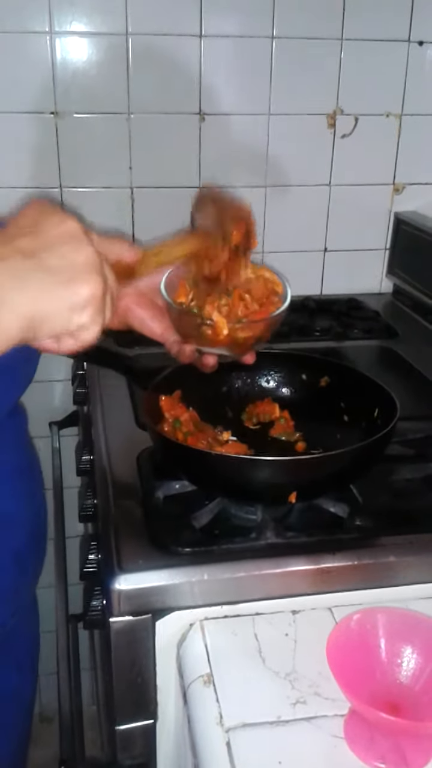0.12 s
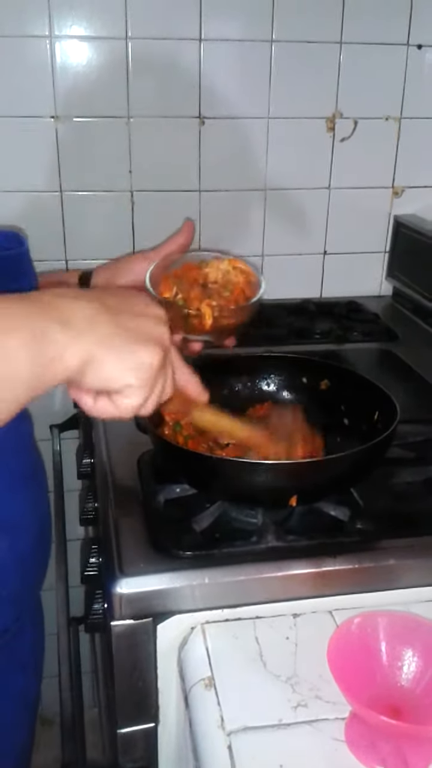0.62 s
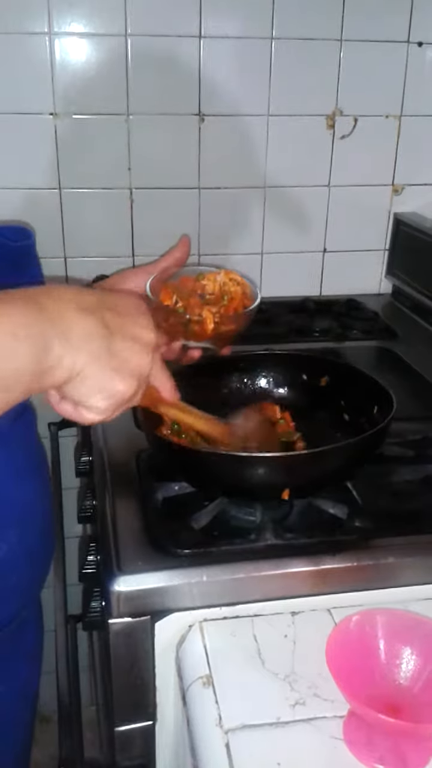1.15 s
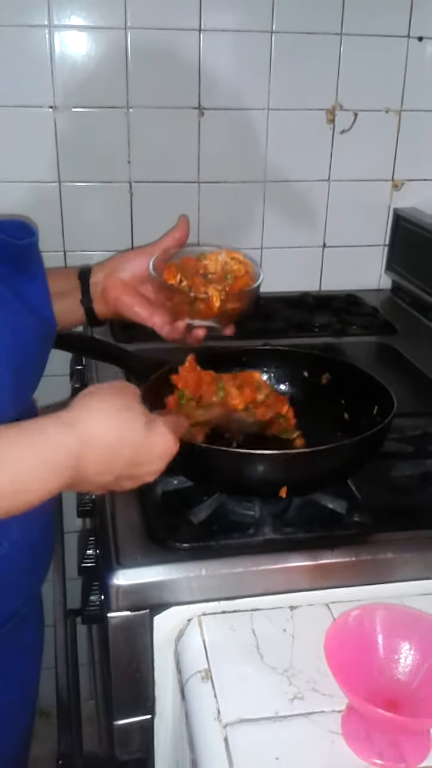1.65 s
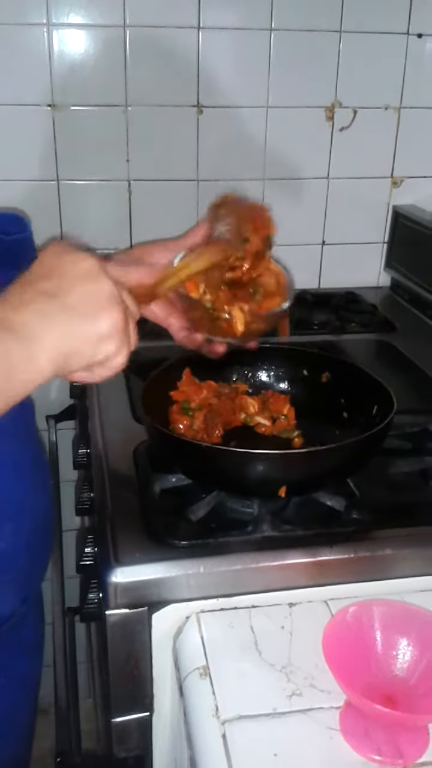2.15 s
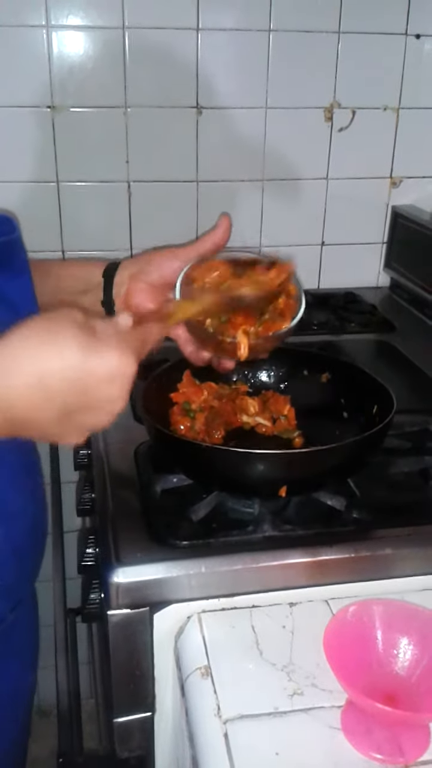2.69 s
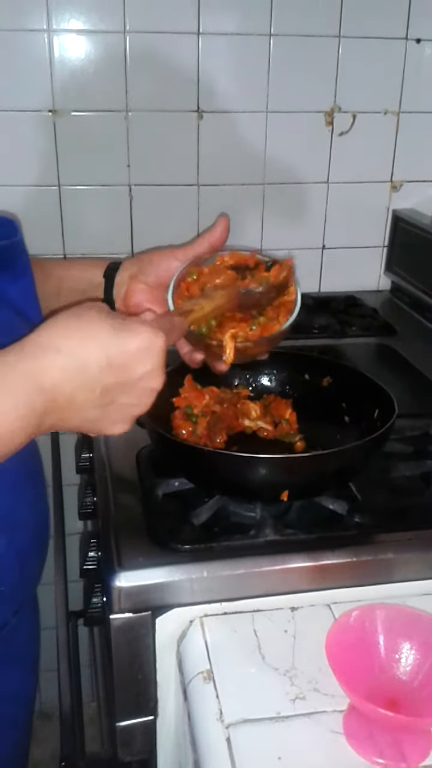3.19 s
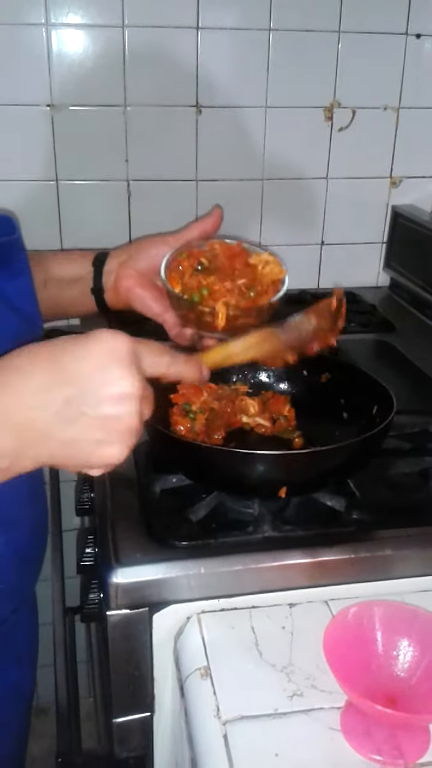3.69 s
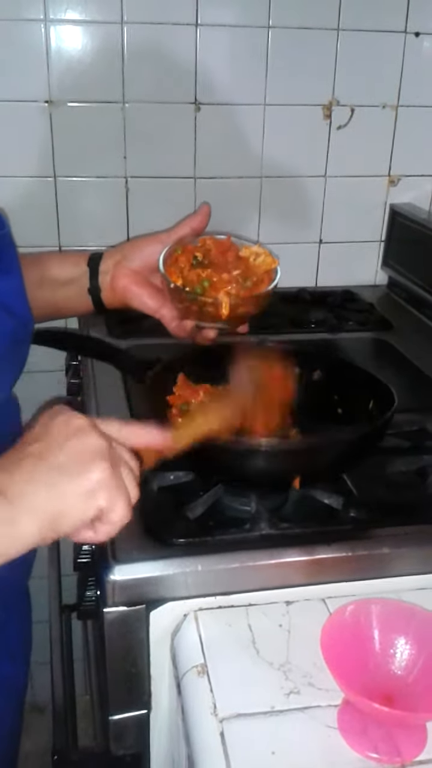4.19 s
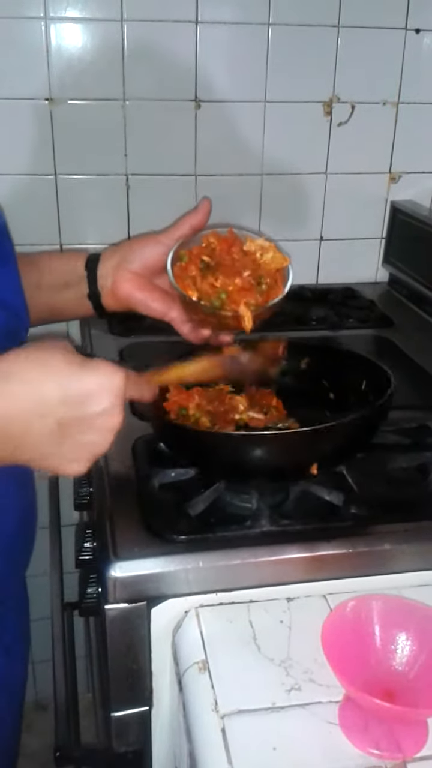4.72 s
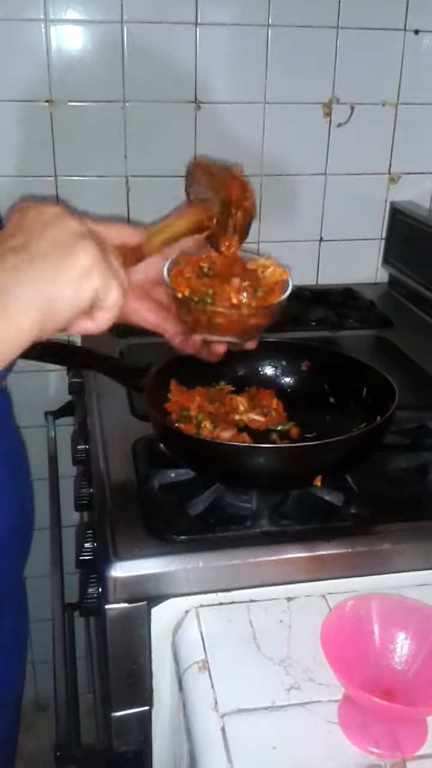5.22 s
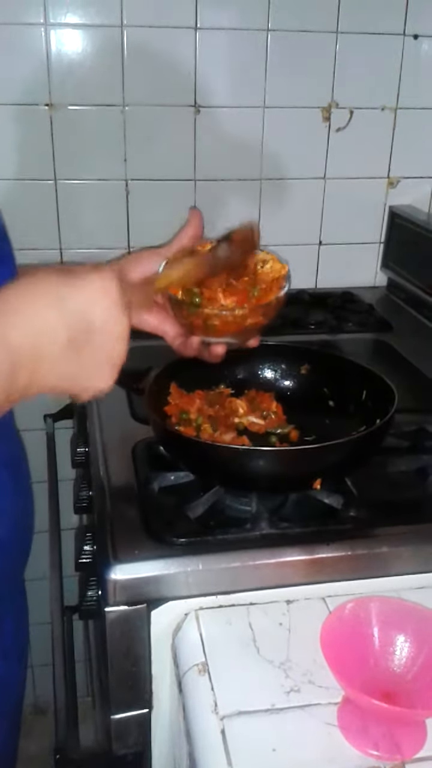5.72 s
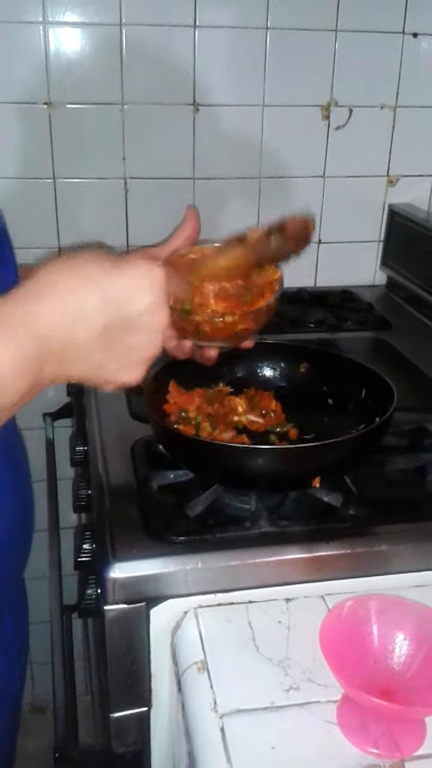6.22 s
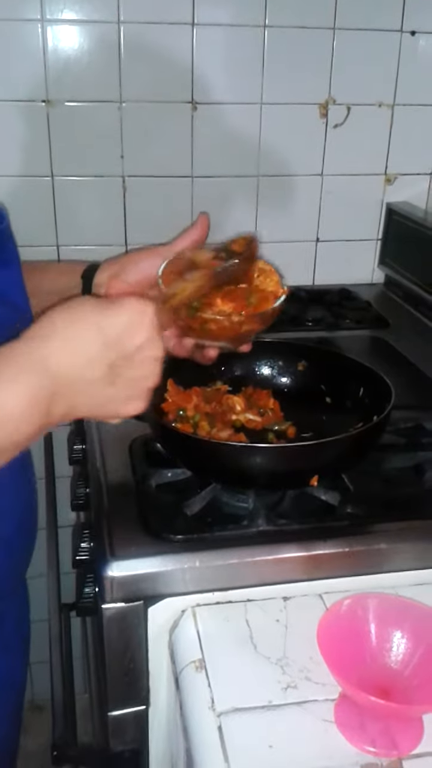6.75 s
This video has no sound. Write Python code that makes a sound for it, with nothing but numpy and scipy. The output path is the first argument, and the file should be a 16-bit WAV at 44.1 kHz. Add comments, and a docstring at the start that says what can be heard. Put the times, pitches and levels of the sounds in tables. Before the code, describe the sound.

A wooden spoon scrapes faintly through moist food in a frying pan, with one small metallic tick early on. After a quiet stretch of soft swipes, it raps the pan hard in a quick uneven volley, rattling it on the iron grate. Shorter scrapes follow and thin out before a small dull tap on a glass bowl. Close microphone, small bright tiled kitchen, steady low motor hum and faint hiss.

```python
"""Spoon and frying pan

A wooden spoon scrapes food around a frying pan, knocks the pan so that it rattles on its iron grate, and taps a
glass bowl, in a small tiled kitchen. Random grains of friction and bursts of clicks excite the decaying modes
of the pan; squeaks, a brief high clink and a chirp are narrow tones. Sparse reflections form the room, and an
appliance motor hums over a faint hiss."""
import sys
import numpy as np
from scipy import signal
from scipy.fft import rfft, irfft, next_fast_len
from scipy.io import wavfile
from scipy.ndimage import uniform_filter1d, minimum_filter1d

SR = 44100
rng = np.random.default_rng(int(sys.argv[2]) if len(sys.argv) > 2 else 0)


def transcribe(signal):
    """Save signal, clipped to [-1, 1], as a 16-bit WAV file at the path in sys.argv[1]."""
    frames = np.atleast_2d(signal).T
    limited = np.clip(frames, -1, 1)
    pcm = np.round(limited * 32767).astype(np.int16)
    wavfile.write(sys.argv[1], SR, pcm)


def ratio(d):
    """dB to gain"""
    e = np.asarray(d, float) / 20
    return 10 ** e


N = 302960

# Centres of the low, middle, high and top bands in Hz.
BAND_HZ = [800, 2200, 4700, 8500]
# Modes of the pan. Each row: frequency in Hz, level in dB, t60 in seconds.
PAN_MODES = [(543, -8, 0.062), (647, -18.5, 0.23), (754, -1, 0.023), (927, 8.5, 0.021), (989, -12, 0.42),
             (1025, -1.5, 0.035), (1157, 2, 0.035), (1571, 3, 0.09), (1610, 1, 0.025), (1720, 6, 0.029),
             (2090, 9.5, 0.019), (2136, 2, 0.031), (2450, -12, 0.0113), (3176, 5, 0.034),
             (3340, -1.5, 0.05), (4350, -17, 0.033), (4360, 9, 0.015), (4270, -12, 0.07),
             (4716, 9.5, 0.024), (4930, -14, 0.074), (5170, 0, 0.033), (5670, -10, .03),
             (6750, -4.5, 0.041), (7700, -7, 0.019), (7340, -5, 0.04), (9100, -1, .02)]
# Colour of the pan and bowl sounds as heard, with a broad lift near 4-5 kHz. Each row: frequency in Hz, gain in
# dB.
HEARD_COLOUR = [(50, -28), (120, -19.5), (300, -4.5), (700, -3.5), (1500, -4.5), (2600, -6), (3700, -7),
                (4200, -3), (4800, -2), (5400, -2.5), (5900, -9.5), (7800, -9.5), (8800, -17), (10000, -17.5),
                (16000, -37)]


def scraping():
    """Friction as a dense train of uneven impulses into modes damped by food; contact sets the bands."""
    # Frictional colour compared with a blow. Each row: frequency in Hz, gain in dB.
    friction_colour = [(80, -8), (135, 9.5), (220, -1.5), (500, 1.5), (1250, 3.5), (2300, 3.5), (4400, 0),
                       (5600, -1.5), (9000, -1.5), (15000, 4)]
    strength = ratio(2.2 * np.minimum(rng.exponential(1, N), 3))
    present = rng.random(N) < 9000 / SR  # 9000 grains per second on average
    grains = rng.standard_normal(N) * strength * present
    damped = [(hz, db, t60 * 0.61) for hz, db, t60 in PAN_MODES]
    body = signal.oaconvolve(grains, ring(damped, spread_db=1.5, click_db=54))[:N]
    parts = bands(coloured(body, HEARD_COLOUR))
    parts = np.array([evened(coloured(part, friction_colour)) for part in parts])
    return (np.sqrt(contact()) * parts).sum(0)


def contact():
    """Powers of independent contacts add: swipes start fast and fade, drags follow the hand's pressure."""
    # Light swipes of the spoon's edge. Each row: start in seconds, time to fade by 22 dB in seconds,
    # high band in dB before the mix, middle band against it in dB, top band against it in dB.
    swipes = [(0.006, 0.29, -45.5, -12, -17), (0.632, 0.36, -49.5, -5.5, -5), (1.06, 0.32, -52, -4.5, -6.5),
              (1.317, 0.097, -61.5, 1.5, 7), (1.424, 0.18, -47.5, -3.5, -6.5), (1.923, 0.078, -57.5, -3, 2),
              (2.105, .2, -50.5, -6, -9), (2.376, 0.127, -53, -8, -17), (2.59, 0.19, -51.5, -2, -20),
              (2.693, 0.18, -47.5, -5, -10.5), (2.853, 0.32, -53, 3, -10), (3.08, 0.22, -38, -14, -11),
              (3.21, 0.72, -47, -11, -15), (3.355, 0.16, -46, -4, -8), (4.278, 0.06, -36, -7, -17.5),
              (4.906, 0.28, -36.5, -12, -10), (5.05, 0.23, -35.5, -1, -16), (5.531, 0.25, -47, -13, -10),
              (5.627, 0.068, -56, -8, -2), (5.953, .11, -61, -12, -16), (6.263, 0.088, -52.5, -5, -16),
              (6.626, 0.046, -51, -19.5, -11), (6.678, 0.042, -49, -7.5, 4)]
    # Heavy drags through the food, one curve each. Each row of a curve: time in seconds,
    # low band in dB before the mix, middle band against it in dB.
    drags = [
        [(.01, -70, 4), (.024, -52.5, 14.5), (.068, -42.5, 2), (.218, -56.5, -17), (.45, -76, 4),
         (.56, -56, -11), (.64, -64, -7)],
        [(1.93, -57, 1), (2.06, -79, -6.5), (2.29, -56, -9), (2.358, -53.5, 3), (2.57, -50, -11),
         (2.61, -51, 1), (2.87, -45, -4.5), (3.01, -52, -6), (3.1, -54.5, 4.5), (3.25, -63, 13), (3.47, -59, 9),
         (3.63, -51, -15), (3.86, -70.5, 12)],
        [(4.28, -36, -10), (4.3, -23, -8), (4.328, -16.5, -12.5), (4.35, -28, 0)],
        [(4.86, -31.5, -15), (4.906, -48.5, 5.5), (4.946, -32.5, -5), (5.036, -35, -0.5), (5.066, -38.5, 10),
         (5.138, -31.5, -1.5), (5.362, -42, -6.5), (5.532, -50, -8.5), (5.652, -46.5, -6.5), (5.778, -53, -7),
         (5.95, -68, -2), (6.16, -75, -12)],
    ]
    low_db, fade_db, fade_bend = -13, -22, 1.65  # low band is against the high band
    attack_s = np.array([[0.023]] * 3 + [[0.039]])  # the sharp top band swells more slowly
    drag_high_db, drag_top_db = -11, -23.5  # against the low band

    t = np.arange(N) / SR
    power = np.zeros((len(BAND_HZ), N))
    for start, length, db, body_db, edge_db in swipes:
        u = np.clip((t - start) / length, 0, None)
        rise = np.minimum(u * length / attack_s, 1)
        balance = ratio(np.array([[low_db], [body_db], [0], [edge_db]]))
        fade = ratio(db + fade_db * u ** fade_bend)
        power += (balance * rise * fade) ** 2
    for rows in drags:
        s, db, middle_db = np.transpose(rows)
        ends = np.clip(np.minimum(t - s[0], s[-1] - t) / .0091, 0, 1)  # 9.1 ms ramps
        low = ends * ratio(np.interp(t, s, db))
        middle = np.interp(t, s, middle_db)
        balance = ratio(np.array([0 * t, middle, 0 * t + drag_high_db, 0 * t + drag_top_db]))
        power += (low * balance) ** 2
    return power


def knock(db, body_db, edge_db):
    """Impact and chatter on the grate as source and resonator: a swelling burst of clicks into pan modes."""
    swell_s, middle_db = .0047, -1.7  # time to the peak of the chatter; middle band against the low band
    t = np.arange(SR // 8) / SR
    u = t / swell_s
    present = rng.random(len(t)) < 12000 / SR  # 12000 clicks per second on average
    z = rfft(rng.standard_normal(len(t)) * present * u * np.exp(-u))
    even = z / np.sqrt(uniform_filter1d(abs(z) ** 2, size=11))  # chatter favours no pitch
    clicks = irfft(even, len(t)) * (t < .08)
    body = signal.fftconvolve(clicks, ring(PAN_MODES, spread_db=2.0, click_db=43.5))
    body = np.pad(body, (200, 0))  # the filters also spread ahead of the blow
    parts = bands(coloured(body, HEARD_COLOUR))
    loudest = np.sqrt(uniform_filter1d(parts ** 2, size=400).max(1))  # rms of the loudest 9 ms
    levels = ratio(db + np.array([body_db, body_db + middle_db, 0, edge_db]))
    return levels / loudest @ parts


def struck(db, hz, t60, swell_s):
    """Free vibration of one mode: a sine swells with time constant swell_s and decays exponentially."""
    t = np.arange(SR // 4) / SR
    decay = ratio(db - 60 * t / t60)
    return decay * np.sin(2 * np.pi * hz * t) * (1 - np.exp(-t / swell_s))


def ring(modes, spread_db, click_db):
    """Modal superposition: the response to one click is the click plus decaying, unevenly struck modes."""
    t = np.arange(SR // 5) / SR
    hz, db, t60 = np.transpose(modes)[:, :, None]
    luck = rng.standard_normal((len(modes), 2))
    decay = ratio(db + spread_db * luck[:, :1] - 60 * t / t60)
    tones = np.sign(luck[:, 1:]) * decay * np.sin(2 * np.pi * hz * t)
    return tones.sum(0) + ratio(click_db) * (t == 0)


def tap(db):
    """Contact time limits bandwidth: soft wood stays on the glass for a moment and rounds the click."""
    # Modes of the bowl. Each row: frequency in Hz, level in dB, t60 in seconds.
    bowl_modes = [(780, -4, 0.0057), (1074, -3.5, 0.018), (1650, -5, 0.0075), (2700, -3, 0.0072),
                  (4540, -4.5, 0.0056)]
    touch = signal.windows.hann(11)
    sound = signal.oaconvolve(ring(bowl_modes, spread_db=-0.5, click_db=-24), touch)
    sound = coloured(sound, HEARD_COLOUR)
    return ratio(db) * sound / abs(sound).max()


def thin_tone(length, hz, db):
    """Stick-slip locked on one high mode, or a brief high clink: a narrow resonance of noise, so that the tone
    wavers."""
    size = round(length * SR)
    return ratio(db) * narrow(size, hz, 41.6) * signal.windows.tukey(size, .4)


def chirp(length, from_hz, to_hz, db):
    """Frequency as the rate of phase: a short falling slip of the wet spoon sums a sliding frequency."""
    size = round(length * SR)
    phase = 2 * np.pi * np.cumsum(np.linspace(from_hz, to_hz, size)) / SR
    return ratio(db) * np.hanning(size) * np.sin(phase)


def tail():
    """Statistical reverberation: sparse reflections of random sign, each band dying at its own speed."""
    # Decay of the room. Each row: frequency in Hz, t60 in seconds.
    room_decay = [(200, 0.64), (700, 0.52), (2000, 0.73), (5000, 0.39), (10000, 0.39), (16000, 0.44)]
    taps, at = np.zeros(SR), np.arange(130, SR - 20, 20)
    taps[at + rng.integers(0, 20, len(at))] = rng.choice([-1., 1.], len(at))
    hz, t, z = signal.stft(taps, SR, nperseg=256)
    decay = ratio(-60 * t / read(room_decay, hz)[:, None])
    out = signal.istft(z * decay, SR, nperseg=256)[1]
    return out / np.linalg.norm(out)


def kitchen():
    """Periodic and random sources superposed: a motor tone, its fuzzy upper bands and a smooth hiss."""
    # Fuzzy motor bands. Each row: frequency in Hz, resonator width in Hz, rms level in dB.
    motor_bands = [(256, 23, -67.5), (324.1, 30, -56.5), (378, 23, -65), (478.2, 16.4, -67)]
    # Spectrum of the hiss. Each row: frequency in Hz, relative density in dB per Hz.
    hiss_spectrum = [(30, -28.5), (60, -26.5), (125, -17.5), (190, -14), (270, -9.5), (500, -16.5),
                     (800, -19.5), (1400, -25), (3600, -27), (4800, -22.5), (5600, -24.5), (6200, -29),
                     (9000, -34.5), (16000, -37.5)]
    hum_hz, hum_db, hiss_db = 160, -56, -57
    tone = np.sqrt(2) * np.sin(2 * np.pi * hum_hz * np.arange(N) / SR)
    tone = tone + .22 * narrow(N, hum_hz, 6)
    drone = sum(ratio(db) * narrow(N, hz, width) for hz, width, db in motor_bands)
    hiss = evened(coloured(rng.standard_normal(N), hiss_spectrum))
    return ratio(hum_db) * tone + drone + ratio(hiss_db) * hiss


def narrow(size, hz, width):
    """Resonance as a pole pair: noise passes two equal resonators of this width in Hz; rms 1."""
    r = np.exp(-np.pi * width / SR)
    pole = [1, -2 * r * np.cos(2 * np.pi * hz / SR), r * r]
    once = signal.lfilter([1], pole, rng.standard_normal(size))
    return evened(signal.lfilter([1, -1], pole, once))


def bands(x):
    """Spectral decomposition: low, middle, high and top parts, overlapping, each of rms 1."""
    size = next_fast_len(len(x))
    at = np.log(np.fft.rfftfreq(size, 1 / SR) + 1)
    z = rfft(x, size)
    weights = [np.interp(at, np.log(BAND_HZ), w) for w in np.eye(len(BAND_HZ))]
    return np.array([evened(irfft(z * weight, size)[:len(x)]) for weight in weights])


def coloured(x, points):
    """Linear filtering as a product of spectra: applies gains given as (Hz, dB)."""
    size = next_fast_len(len(x))
    gain = ratio(read(points, np.fft.rfftfreq(size, 1 / SR)))
    return irfft(rfft(x, size) * gain, size)[:len(x)]


def read(points, hz):
    """Interpolation of a curve over logarithmic frequency."""
    f, value = np.transpose(points)
    return np.interp(np.log(hz + 1), np.log(f + 1), value)


def evened(x):
    """Normalisation by mean power: scales to rms 1."""
    return x / np.sqrt(np.mean(x ** 2) + 1e-20)


def add(mix, s, sound):
    """Superposition: mixes a sound in at s seconds."""
    part = mix[max(round(s * SR), 0):][:len(sound)]
    part += sound[:len(part)]


def scene():
    """Direct plus reverberant sound: blows feed three room tails, scraping moves among them."""
    # Spoon blows on the pan. Each row: time in seconds, high band (clatter) in dB,
    # low band (body) against it in dB, top band (sharp edge) against it in dB.
    knocks = [(0.0191, -45.5, -2.5, -26), (1.7632, -39.5, -1, -11.5), (1.8862, -47.5, -1, -14),
              (3.0939, -52, -17, -1), (3.8726, -15, -8, -8.5), (3.9589, -21.5, -8, -13),
              (4.1258, -19, -8, -16), (4.2104, -23, -8.5, -19), (4.3369, -20, -5.5, -17),
              (4.4164, -23.5, -2, -15.5), (4.5411, -30.5, -9, -16), (4.6076, -38.5, 1.5, -15),
              (4.7036, -31, -4.5, -18), (4.7121, -26, -2, -16), (5.0552, -41, 4.5, -12),
              (5.8015, -57.5, 4.5, -17), (5.9564, -50, -21, -14)]
    # approximate frequencies of the named modes in Hz; THUD is the wooden spoon's own dull thud
    THUD, HOLLOW, DULL, PING = 754, 1170, 2170, 3170
    BELL, CLACK, CLANG, TINK = 3340, 4380, 4760, 5216
    # Blows that ring one mode, taken from the pan table nearest to the named one; THUD rows are the spoon's own
    # thud. Each row: time in seconds, level in dB, named mode in Hz.
    mode_blows = [(1.763, -34, BELL), (1.762, -30, DULL), (1.761, -32, CLACK), (1.762, -27.5, TINK),
                  (1.887, -49, BELL), (3.868, -4, THUD), (3.959, -4, CLACK), (4.119, -12, THUD),
                  (4.127, -9, CLANG), (4.213, -18, PING), (4.324, -7, THUD), (4.336, 3.5, CLACK),
                  (4.54, -6, CLACK), (4.61, -26, PING), (4.703, -5.5, CLACK), (4.711, -11, HOLLOW)]
    # The stove top booms under the heaviest blows. Each row: time in seconds, level in dB.
    booms = [(3.869, -23.5), (4.12, -32), (4.338, -38), (4.418, -55), (4.713, -33)]
    # Spoon taps on the bowl. Each row: time in seconds, peak level in dB.
    bowl_taps = [(6.175, -24), (6.202, -43)]
    # Squeaks of wet wood on metal, and near 5.13 s a brief high clink of glass or metal. Each row: start in
    # seconds, length in seconds, frequency in Hz, rms level in dB before the ends are tapered.
    thin_tones = [(4.296, 0.072, 7120, -40.5), (4.869, 0.088, 7146, -50), (5.129, 0.046, 7330, -56),
                  (5.133, 0.018, 10100, -56), (5.135, .02, 12600, -62)]
    # One wet chirp: start in seconds, length in seconds, first and last frequency in Hz, level in dB.
    wet_chirp = (2.163, .018, 4600, 3600, -45)

    blows = np.zeros((3, N))  # one row for each room tail
    for k, (s, *how) in enumerate(knocks):
        add(blows[k % 3], s - 200 / SR, knock(*how))  # a knock has 200 samples of lead
    for s, db, near_hz in mode_blows:
        hz, _, t60 = min(PAN_MODES, key=lambda mode: abs(mode[0] - near_hz))
        add(blows[2], s, struck(db, hz, t60, swell_s=0.0023))
    for s, db in booms:
        add(blows[2], s, struck(db, hz=170, t60=.12, swell_s=0.0096))
    for s, db in bowl_taps:
        add(blows[0], s, tap(db))
    for s, *how in thin_tones:
        add(blows[1], s, thin_tone(*how))
    add(blows[1], wet_chirp[0], chirp(*wet_chirp[1:]))

    rub = scraping()
    # signed weights of the tails turn at 4 Hz, a third of a cycle apart
    turn = np.cos(2 * np.pi * (4 * np.arange(N) / SR + np.arange(3)[:, None] / 3))
    sent = ratio(-1.0) * blows + ratio(-9.5) * rub * turn
    room = sum(signal.oaconvolve(x, tail())[:N] for x in sent)
    return (blows.sum(0) + ratio(-5) * rub + room + kitchen())[None]


def roll_off(x):
    """The treble ends steeply here."""
    return signal.sosfilt(signal.butter(12, 16150, fs=SR, output="sos"), x)


def record(dry):
    """Peak limiting by a smoothed gain that lets go within some 10 ms, then a low-pass band limit."""
    room_left = np.minimum(0.63 / (abs(dry) + 1e-9), 1)
    gain = uniform_filter1d(minimum_filter1d(room_left, size=441), size=441)
    edge = signal.firwin(255, 16050, fs=SR)[None]  # cutoff in Hz
    finished = signal.oaconvolve(dry * gain, edge, "same")
    return roll_off(finished)


dry = scene()
out = record(dry)
transcribe(out)
```